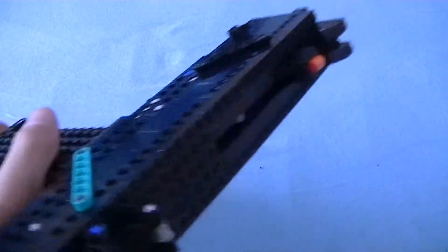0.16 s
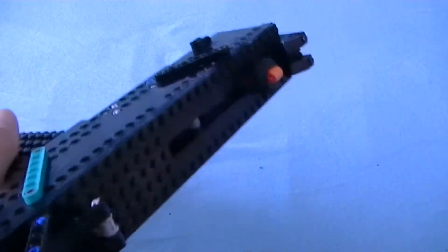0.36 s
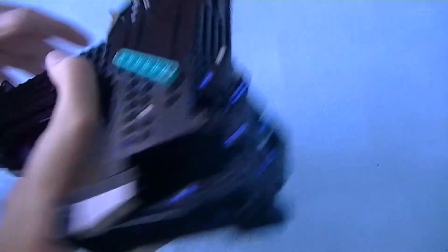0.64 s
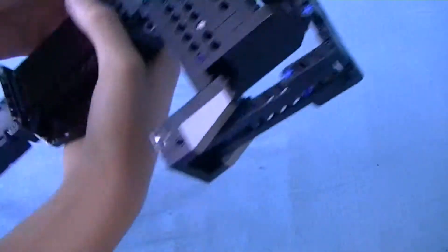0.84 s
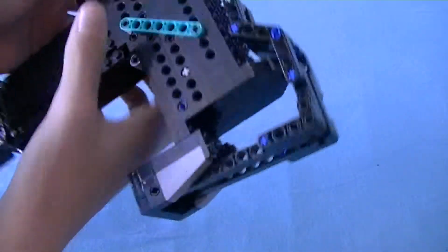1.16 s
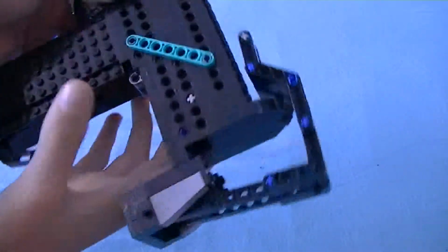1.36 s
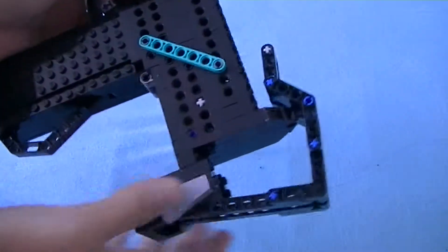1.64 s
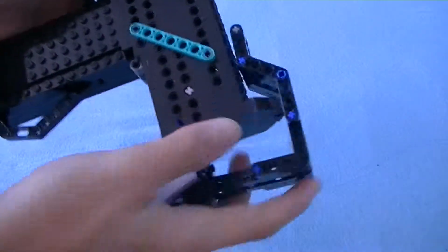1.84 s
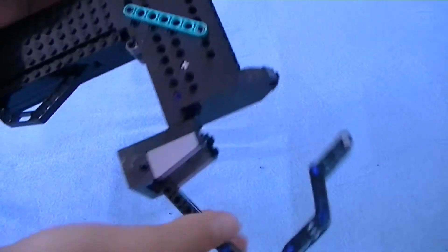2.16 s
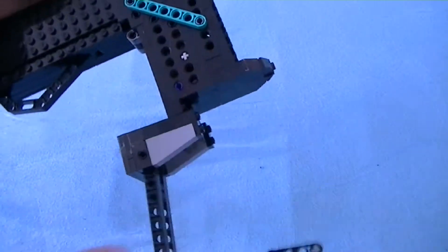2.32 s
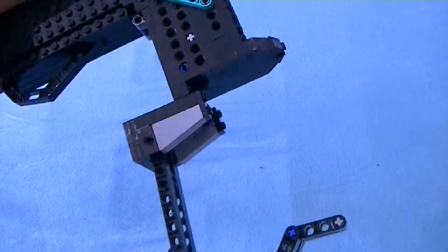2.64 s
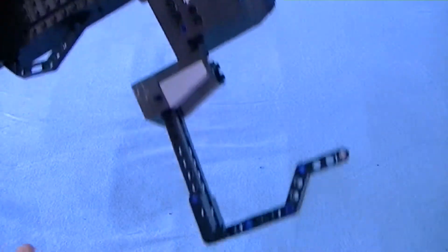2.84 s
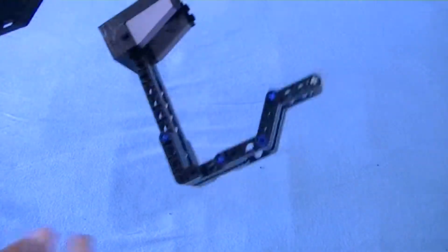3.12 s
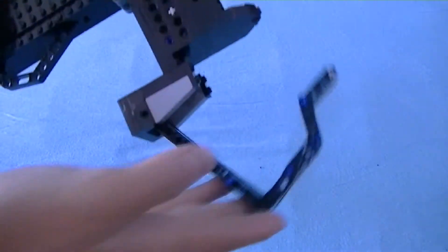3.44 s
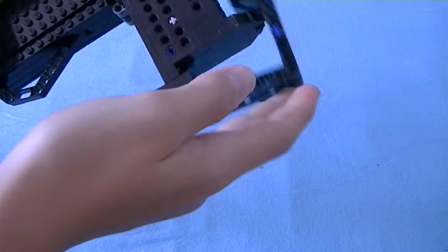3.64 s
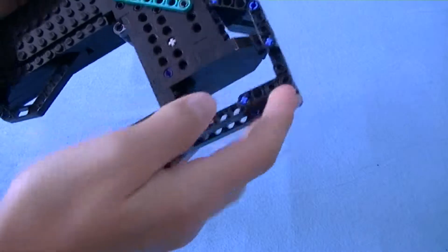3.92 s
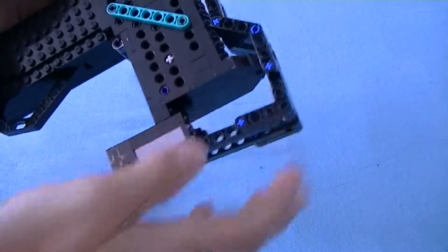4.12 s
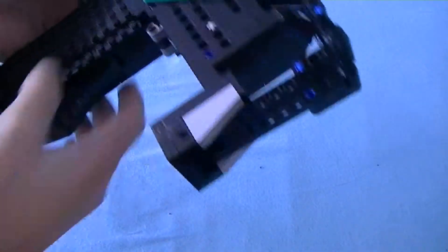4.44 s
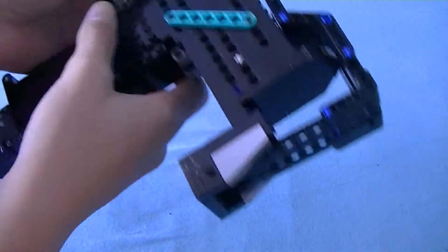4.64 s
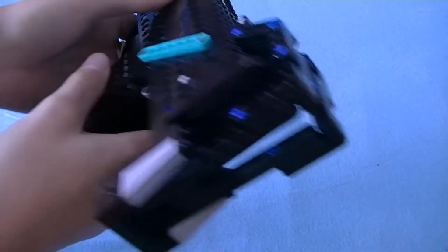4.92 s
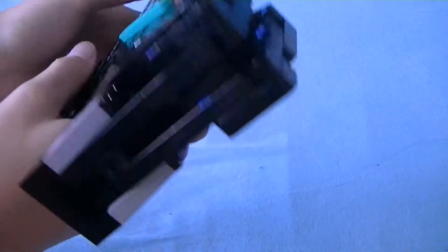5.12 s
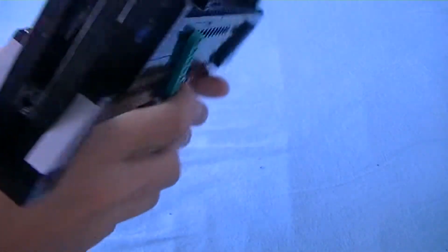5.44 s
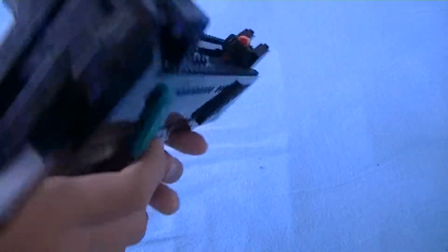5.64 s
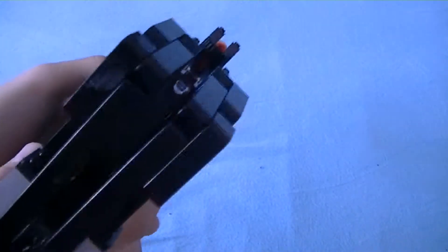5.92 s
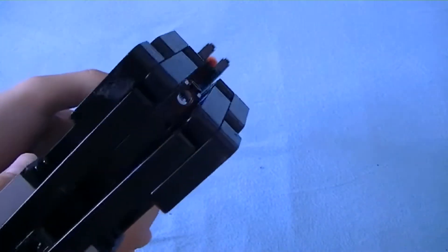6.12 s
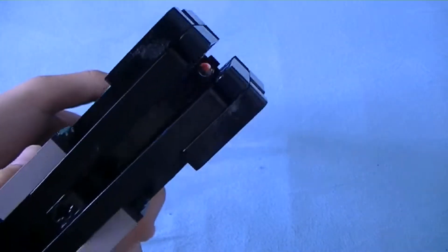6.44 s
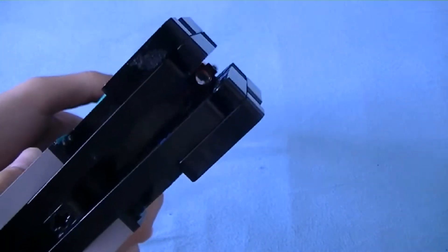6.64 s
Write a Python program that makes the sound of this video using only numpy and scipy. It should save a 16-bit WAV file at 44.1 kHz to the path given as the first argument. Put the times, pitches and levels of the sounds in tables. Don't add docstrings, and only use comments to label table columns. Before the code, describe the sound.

Quiet small room, close small microphone, steady soft hiss with a very faint high pulsing pip, about 25 per second. At 0 s a couple of light plastic ticks and brushing fingers over studs, strongest around 0.2 s. From 0.7 s clicks gather; at 1.03-1.1 s the hollow brick model clatters loudest, bright cracks over a boxy knock. Dense rattling clicks continue to about 1.6 s, strong at 1.35 s, then thin out. A click at 1.9 s, then a hard clack at 2.14 s as the hinged arm opens; small bright ticks at 2.4 s with a rub. Near quiet until 3.43 s; a loud snap with low knock at 3.66 s, rattling to 3.9 s. Isolated ticks at 4.0 and 4.2 s, light duller clicks 4.5-5.6 s, clearer at 4.84 and 5.06 s, one last click at 5.8 s, then faint handling and hiss to 7 s.

```python
import sys
import numpy as np
from scipy import signal
from scipy.fft import rfft, irfft, next_fast_len
from scipy.io import wavfile
from scipy.ndimage import uniform_filter1d

SR = 44100
rng = np.random.default_rng(int(sys.argv[2]) if len(sys.argv) > 2 else 0)


def amp(db):
    return 10 ** (np.asarray(db, float) / 20)


def write(x):
    x = np.atleast_2d(x).T
    wavfile.write(sys.argv[1], SR, np.round(np.clip(x, -1, 1) * 32767).astype(np.int16))


N = 298557


def rms_one(x):
    return x / np.sqrt(np.mean(x ** 2) + 1e-20)


def coloured(x, spectrum):
    size = next_fast_len(N)
    f_hz = np.arange(1, size // 2 + 2) * SR / size
    at_hz, level_db = np.transpose(spectrum)
    outside_oct = np.log2(np.maximum(at_hz[0] / f_hz, 1) * np.maximum(f_hz / at_hz[-1], 1))
    gain_db = np.interp(np.log(f_hz), np.log(at_hz), level_db) - 18 * outside_oct
    return rms_one(irfft(rfft(x, size) * amp(gain_db), size)[:N])


def above(level_db, floor_db):
    return np.sqrt(np.maximum(amp(level_db) ** 2 - amp(floor_db) ** 2, 0))


def hiss():
    # f/Hz, density/dB [per Hz]
    hiss_spectrum = [(12, -58), (20, -4), (31, -21), (156, -8), (230, -5), (342, -3), (452, -3.5),
                     (599, -3.5), (1470, -5), (1690, -6), (3230, -8), (15200, -18), (16500, -44.5)]
    return amp(-58.5) * coloured(rng.standard_normal(N), hiss_spectrum)


def hands():
    # t/s, half length/s, pressure/dB, sliding speed/dB
    strokes = [(0, 0.053, -50, -54.5), (0.178, 0.071, -43, -51), (.33, 0.09, -56, -55),
               (.52, .1, -60.5, -71), (.8, 0.11, -59.5, -57.5), (1.003, 0.057, -53.5, -66.5),
               (1.204, 0.093, -53, -60), (1.45, 0.13, -55, -54.5), (1.902, 0.21, -61, -67),
               (2.2, 0.045, -56, -60), (2.438, 0.1, -54.5, -52), (3.473, .12, -58, -55.5),
               (3.742, 0.095, -58, -62), (4.4, .15, -66.5, -64), (4.701, 0.11, -60.5, -63.5),
               (5.003, 0.084, -61.5, -67), (5.66, 0.1, -62, -55.5), (5.902, 0.11, -67, -62)]
    t_s = np.arange(N) / SR
    power = amp(np.array([[-61], [-61.5]])) ** 2
    for start_s, half_s, press_db, speed_db in strokes:
        bell = np.exp(-((t_s - start_s) / half_s) ** 2)
        power = power + bell * amp(np.array([[press_db], [speed_db]])) ** 2
    return 10 * np.log10(power)


def fingers():
    # f/Hz, density/dB [per Hz]
    rub = [(180, -48.5), (300, -11), (427, -3), (557, -3), (1000, -11), (1300, -34.5), (2200, -120)]
    # f/Hz, density/dB [per Hz]
    scrape = [(470, -27), (800, -6.5), (884, -3), (1360, -4), (1540, -1.5), (2020, 0.5), (4160, -10.5),
              (5000, -12.5), (6500, -43.5), (11000, -120)]
    # f/Hz, density/dB [per Hz]
    skin = [(1760, -40), (3000, 0.5), (4800, 1.5), (7750, 0), (13600, -7.5), (15800, -17.5), (16500, -33)]
    scrape_db, skin_db = hands()
    rub_db = -66.5 + 0.6 * (scrape_db + 60)
    grain_spread_db = np.array([[1.5], [3.0], [2.5]])
    grain_db = grain_spread_db * rng.exponential(1, (3, N)).clip(0, 4.5)
    grains = rng.standard_normal((3, N)) * amp(grain_db)
    slow = uniform_filter1d(uniform_filter1d(rng.standard_normal(N), size=300), size=300)
    lumps = amp(1.5 * rms_one(slow))
    return (above(rub_db, -67.5) * coloured(grains[0], rub)
            + above(scrape_db, -61.5) * coloured(grains[1] * lumps, scrape)
            + above(skin_db, -62.5) * coloured(grains[2], skin))


def pip():
    # t/s, half length/s, peak/dB
    pip_swells = [
        (.7, .08, -57),
        (2.75, 0.084, -63),
        (3.15, .12, -66.5),
        (4.2, 0.11, -65.5),
        (5.62, .15, -57),
        (6.42, 0.11, -58.5),
        (6.65, .03, -64),
        (6.77, .03, -61),
    ]
    pip_hz, pips_per_s, width_ms, start_s, rest_db = 3213, 25, 5.0, 0.002, -75.5
    t_s = np.arange(N) / SR - start_s
    turn = np.round(t_s * pips_per_s)
    shape = np.exp(-0.5 * ((t_s - turn / pips_per_s) * 1000 / width_ms) ** 2)
    uneven_db = 1.5 * rng.standard_normal(int(turn[-1]) + 1)[turn.astype(int)]
    swell = amp(rest_db)
    for at_s, half_s, peak_db in pip_swells:
        swell = swell + amp(peak_db) * np.exp(-0.5 * ((t_s - at_s) / half_s) ** 2)
    return swell * amp(uneven_db) * shape * np.sin(2 * np.pi * pip_hz * t_s)


def contacts():
    # t/s, body peak/dB, crack peak/dB, favoured pitch/Hz
    tipping = [(.012, -29.5, -44, 1684), (.022, -35, -40, 1810), (.088, -43, -58, 900),
               (.622, -49.5, -58, 1585), (.71, -37, -44, 1695), (.84, -30.5, -33, 2450),
               (0.8572, -29.5, -42.5, 1360), (.886, -39.5, -36.5, 1870), (.9045, -40, -47.5, 2406),
               (.9125, -35.5, -44, 1660), (.929, -31.5, -51.5, 1990), (.971, -46, -56.5, 2335),
               (1.022, -30.5, -44, 1690), (1.031, -18.5, -25, 2300), (1.054, -21, -23, 2400),
               (1.057, -17.5, -16, 2500), (1.1042, -11.5, -11, 1410), (1.118, -35.5, -37.5, 1304),
               (1.136, -26, -49, 1500), (1.207, -38.5, -53.5, 1204), (1.22, -35.5, -56, 1300),
               (1.2382, -26.5, -42, 1230), (1.261, -40, -52.5, 1754)]
    regrip = [(1.291, -20.5, -22.5, 2400), (1.305, -40, -38.5, 1530), (1.322, -25, -32, 1900),
              (1.34, -20.5, -17, 2330), (1.344, -23.5, -20, 2400), (1.361, -18.5, -26.5, 1507),
              (1.3786, -19, -38, 2930), (1.422, -20, -37.5, 1300), (1.457, -38, -39, 4500),
              (1.471, -40, -48.5, 2090), (1.499, -39.5, -50, 1155), (1.517, -18, -32.5, 1780),
              (1.546, -38, -38.5, 2100), (1.557, -22, -40, 1210), (1.564, -44, -36, 1220),
              (1.586, -47.5, -43, 1660), (1.717, -48.5, -52.5, 926), (1.747, -34, -52, 1315)]
    arm = [(1.8545, -43.5, -42, 2010), (1.902, -24.5, -27.5, 2720), (1.916, -31, -51, 1500),
           (2.038, -41.5, -53, 2020), (2.046, -30.5, -41.5, 2870), (2.074, -43.5, -45, 1352),
           (2.089, -45, -49.5, 1980), (2.105, -41, -38.5, 2950), (2.129, -30, -43, 2060),
           (2.136, -23, -23, 1990), (2.143, -17, -18.5, 2780), (2.4265, -28, -21, 4200),
           (2.442, -36, -36, 1250), (2.467, -40, -52, 2280), (2.536, -31, -45.5, 1370),
           (3.43, -37, -35, 2430), (3.661, -16, -19, 2204), (3.667, -22.5, -32, 2570),
           (3.7254, -27, -52, 1230), (3.735, -32, -42, 1600), (3.835, -29, -33, 1010),
           (3.862, -40, -54, 2200), (4.001, -39, -35, 2640), (4.182, -36.5, -37, 2740),
           (4.237, -43, -62.5, 1160)]
    turning = [(4.52, -41, -50, 1500), (4.576, -44.5, -55, 1490), (4.614, -32, -51.5, 998),
               (4.649, -43, -61, 1390), (4.684, -42, -46.5, 1950), (4.704, -37, -50, 1404),
               (4.803, -42, -58, 1390), (4.8255, -27, -36.5, 1560), (4.833, -35, -46, 2593),
               (4.841, -21, -43, 1346), (4.958, -48, -49, 1960), (4.977, -35.5, -54.5, 1390),
               (5.014, -46, -56, 2150), (5.059, -24, -41, 1890), (5.167, -27, -38, 1690),
               (5.24, -45, -48.5, 2170), (5.267, -59.5, -49.5, 991), (5.465, -40.5, -42.5, 2400),
               (5.497, -31.5, -45.5, 1000), (5.533, -36, -60.5, 1390), (5.565, -43.5, -52.5, 1603),
               (5.7924, -23.5, -31.5, 1900), (5.822, -49, -40, 1320)]
    touches = [(1.0404, -25, -30.5, 1800), (1.1025, -27, -29, 2500), (2.1495, -22.5, -36, 2500),
               (2.156, -25, -39, 2500), (2.421, -37, -32, 4000), (2.4244, -38, -29, 4200),
               (1.8565, -37, -26, 4600), (3.721, -33.5, -52, 1000), (3.8333, -28, -44, 2800),
               (5.801, -39.5, -49.5, 1600), (1.35, -25.5, -32, 2500), (1.3, -29.5, -42, 2100),
               (1.071, -25, -45.5, 2700), (2.4445, -40, -30, 4500), (1.498, -52, -31, 2500),
               (3.744, -34, -45, 2600), (1.127, -33.5, -46, 1350), (.8885, -41, -46, 4200),
               (1.3415, -24, -22, 3300), (1.347, -26, -29, 3000), (1.355, -30, -34, 2800),
               (1.386, -30, -44, 3000), (1.396, -33, -46, 2800), (5.5, -36, -50, 2300),
               (5.537, -40, -52, 2400), (2.4225, -40, -32, 3000), (2.4318, -36, -44, 4100),
               (2.4345, -37, -44, 4400)]
    rattle = [(.0075, -42, -44, 1800), (.028, -33.5, -50, 1690), (.8642, -38, -46, 2200),
              (.877, -39, -52, 1800), (.927, -37, -44, 2000), (.993, -41.5, -57.5, 2100),
              (1.034, -22, -36, 1800), (1.0445, -31, -37, 1900), (1.049, -33, -36, 2200),
              (1.0774, -30.5, -42, 2300), (1.0862, -32.5, -46, 2300), (1.093, -31, -44, 2000),
              (1.145, -29.5, -50, 1500), (1.155, -33.5, -52, 1400), (1.2266, -34, -52, 1600),
              (1.2827, -38.5, -54, 1500), (1.3087, -40, -36, 1800), (1.4118, -33, -50, 1900),
              (1.4355, -31.5, -46, 1410), (1.5096, -38.5, -44, 1500), (1.5515, -42, -42, 1900),
              (1.5671, -42, -41, 1400), (1.571, -33.5, -46, 1400), (1.577, -46, -45, 1500),
              (1.8495, -43, -45, 2200), (1.907, -26.5, -36, 2700), (1.922, -26, -48, 1500),
              (2.1404, -26, -27, 2200), (2.4286, -32, -27, 4200), (2.4378, -35.5, -42, 1900),
              (3.6644, -21.5, -26, 2700), (3.6711, -19, -32, 2600), (3.6785, -25, -40, 2400),
              (3.6887, -30.5, -39, 2600), (3.7012, -34, -41.5, 2700), (3.7316, -33, -44, 3300),
              (3.8453, -35, -41, 2000), (3.853, -37, -48, 2500), (4.1865, -38.5, -47, 2700),
              (4.815, -42, -60, 1300), (4.8542, -35, -56.5, 1406), (4.8673, -39.5, -58.5, 1294),
              (5.064, -30.5, -50, 1800), (5.073, -36.5, -54, 1500), (5.8197, -41, -42, 1500)]
    # ring stretch/1, crack pitch/Hz where crack level equals body level
    held = [
        (.85, 7500),
        (0.79, 7300),
        (0.93, 8000),
        (0.78, 6100),
        (.9, 9000),
        (.7, 6300),
    ]
    # t/s, pitch/Hz
    cracks = [(0.0224, 6200), (0.8403, 4900), (0.8864, 5600), (1.0311, 6900), (1.0396, 7100),
              (1.0485, 6900), (1.0567, 6000), (1.0651, 4800), (1.0716, 4800), (1.0834, 4500),
              (1.0963, 6200), (1.104, 8100), (1.1143, 5100), (1.1187, 6800), (1.1344, 6800), (1.2375, 5200),
              (1.2915, 6000), (1.3054, 7700), (1.3228, 4400), (1.3395, 6900), (1.3507, 5800),
              (1.3554, 6000), (1.3606, 7900), (1.3778, 4900), (1.4219, 4800), (1.4576, 5600),
              (1.4981, 11600), (1.5168, 6800), (1.5566, 6000), (1.5595, 8600), (1.5629, 9600),
              (1.5671, 9500), (1.5867, 7500), (1.8566, 8800), (1.9026, 6800), (2.0462, 6100),
              (2.1053, 7900), (2.129, 5700), (2.1368, 7600), (2.1404, 8300), (2.1432, 7400), (2.1474, 6600),
              (2.1715, 5800), (2.4267, 8400), (2.4346, 4900), (2.4446, 6300), (2.4512, 5600),
              (3.4308, 8100), (3.661, 7700), (3.6644, 5300), (3.6888, 6200), (3.7013, 6600), (3.8359, 4300),
              (4.0007, 6600), (4.1821, 7700), (4.8257, 6300), (4.8403, 4800), (5.1661, 7300),
              (5.7924, 5600), (5.8226, 8500)]
    same_contact_s, damping_per_db, crack_oct_per_db = 0.0025, 0.0265, 0.022
    crack_s, wall_hz = np.transpose(cracks)
    rows = []
    for table, (stretch, equal_hz) in zip((tipping, regrip, arm, turning, touches, rattle), held):
        for at_s, body_db, crack_db, pitch_hz in table:
            gap_s = np.abs(crack_s - at_s)
            if gap_s.min() < same_contact_s:
                crack_hz = wall_hz[gap_s.argmin()]
            else:
                crack_hz = equal_hz * 2 ** (crack_oct_per_db * (crack_db - body_db))
            damped = stretch - damping_per_db * (body_db + 30)
            rows.append((at_s, body_db, crack_db, pitch_hz, damped, crack_hz))
    return rows


def struck(modes, chance, stretch, favoured_hz, spread_db, detune, focus_db):
    f_hz, level_db, t60_s = np.transpose(modes)[:, :, None]
    t60_s = t60_s * max(stretch, 0.2)
    t_s = np.arange(round(min(0.13, 0.8 * t60_s.max()) * SR)) / SR
    off_pitch_oct = np.abs(np.log2(f_hz / favoured_hz))
    level_db = level_db + spread_db * chance[0][:, None] - focus_db * off_pitch_oct
    sign = np.sign(chance[2][:, None] + 0.9)
    wave = sign * np.sin(2 * np.pi * f_hz * (1 + detune * chance[1][:, None]) * t_s)
    ring = np.sum(amp(level_db) * np.exp(-np.log(1000) * t_s / t60_s) * wave, axis=0)
    return np.pad(ring, (0, 6144 - len(t_s)))


def shiver(noise, low_hz, high_hz, level_db, t60_s):
    t_s = np.arange(len(noise)) / SR
    f_hz = np.arange(1, len(noise) // 2 + 2) * SR / len(noise)
    loss = np.sqrt((1 + (low_hz / f_hz) ** 6) * (1 + (f_hz / high_hz) ** 4))
    band = irfft(rfft(noise) / loss, len(noise))
    swell = 1 - np.exp(-t_s / 0.0035)
    return amp(level_db - 60 * t_s / t60_s) * swell * rms_one(band)


def clicks():
    # f/Hz, level/dB, t60/s
    body_modes = [(560, -16, 0.043), (762, -6, 0.037), (920, -4.5, 0.041), (1055, 2.5, 0.032),
                  (1123.4, 0.5, 0.047), (1220, 0.5, 0.029), (1315, 2.5, 0.043), (1390, 3, 0.022),
                  (1496, 4, 0.024), (1665, -2.5, 0.047), (1780, 0, 0.019), (1935, 2.5, 0.022),
                  (1990, -8.5, 0.052), (2090, 5.5, 0.015), (2160, 0.5, 0.021), (2400, 4, 0.019),
                  (2523, 5.5, 0.019), (2640, -3, 0.041), (2870, 6.5, 0.019), (3167, 0.5, 0.031),
                  (3424, -4.5, 0.03), (3700, -3, .015), (4150, -3, .012), (4600, -6, .012)]
    # f/Hz, level/dB, t60/s
    wall_modes = [(3970, -7, 0.0047), (4720, -12, 0.0097), (5670, -15.5, 0.014), (6100, 0.5, 0.0013),
                  (6720, -0.5, 0.0027), (7340, -4.5, 0.0025), (8720, -2.5, 0.0032), (9330, -4, .003),
                  (11100, -4.5, 0.003), (12050, -7.5, 0.0027), (15500, -16.5, 0.0013)]
    # level/dB [re blow], t60/s
    buzz_decay = [
        (-17, 0.12),
        (-19, 0.07),
    ]
    (body_buzz_db, body_t60_s), (wall_buzz_db, wall_t60_s) = buzz_decay
    contact_ms, swell_s, resonant_share = 0.54, 0.0006, 0.35
    lead = 40
    out, t_ms, blows = np.zeros(N + SR), np.arange(400) / SR * 1000, contacts()
    chances = rng.standard_normal((len(blows), 3, len(body_modes) + len(wall_modes)))
    chatters = rng.standard_normal((len(blows), len(t_ms))) ** 3
    chatters = chatters * (t_ms + 0.22) * np.exp(-t_ms / contact_ms)
    chatters[:, 36] += 5.0
    noises = rng.standard_normal((len(blows), 2, 6144))
    for blow, chance, chatter, noise in zip(blows, chances, chatters, noises):
        at_s, body_db, crack_db, pitch_hz, stretch, crack_hz = blow
        body_chance, wall_chance = np.split(chance, [len(body_modes)], axis=1)
        body = struck(body_modes, body_chance, stretch, pitch_hz, spread_db=2.5, detune=0.008, focus_db=9.5)
        body = body * (1 - np.exp(-np.arange(len(body)) / SR / swell_s)) ** 2
        walls = struck(wall_modes, wall_chance, 1.0, crack_hz, spread_db=1.0, detune=0.03, focus_db=5.0)
        resonant = rms_one(irfft(rfft(noise[0] ** 3) * rfft(body)))
        rung = resonant_share * resonant + (1 - resonant_share) * noise[1]
        longer = max(stretch, 0.2)
        body_buzz = shiver(rung, 0.65 * pitch_hz, 1.64 * pitch_hz, body_buzz_db, body_t60_s * longer)
        wall_buzz = shiver(noise[1], 3300, 1.2 * crack_hz, wall_buzz_db, wall_t60_s * longer)
        walls = np.pad(np.convolve(walls[:600], chatter), (0, len(body)))[:len(body)]
        start = round(at_s * SR) - lead
        for ring, buzz, peak_db in ((body, body_buzz, body_db - 0.1), (walls, wall_buzz, crack_db + 7.0)):
            out[start:start + len(ring)] += amp(peak_db) * (ring / np.abs(ring).max() + buzz)
    small = signal.sosfilt(signal.butter(4, 734, "high", fs=SR, output="sos"), out[:N])
    return small + amp(-33.5) * out[:N]


def thumps():
    # t/s, peak/dB
    heavy_blows = [
        (1.029, -42),
        (1.103, -45.5),
        (2.143, -40.5),
        (3.661, -42),
        (3.673, -41.5),
        (3.722, -43),
    ]
    # f/Hz, level/dB, t60/s
    whole_modes = [(270, -5.5, 0.043), (390, -3, .04), (483, 0.5, 0.049), (602, 1, 0.046)]
    out = np.zeros(N)
    chances = rng.standard_normal((len(heavy_blows), 3, len(whole_modes)))
    for (at_s, peak_db), chance in zip(heavy_blows, chances):
        knock = struck(whole_modes, chance, 1, 450, spread_db=3.5, detune=0.05, focus_db=-1.5)
        out[round(at_s * SR):][:len(knock)] += amp(peak_db) * knock / np.abs(knock).max()
    return signal.sosfilt(signal.butter(2, 230, "high", fs=SR, output="sos"), out)


def room(x):
    # f/Hz, t60/s
    room_decay = [(700, 0.17), (1600, 0.25), (4200, .16), (10000, 0.14)]
    t_s, tail = np.arange(SR // 3) / SR, 0
    for f_hz, t60_s in room_decay:
        band = signal.butter(1, [f_hz * 0.6, f_hz * 1.6], "band", fs=SR, output="sos")
        tail = tail + signal.sosfilt(band, rng.standard_normal(len(t_s))) * amp(-60 * t_s / t60_s)
    tail = tail * np.clip(t_s / 0.0029 - 0.5, 0, 1)
    return signal.fftconvolve(x, tail / np.sqrt(np.sum(tail ** 2)))[:N]


def scene():
    near = clicks() + thumps()
    return (near + amp(-14.5) * room(near) + fingers() + pip() + hiss())[None]


def roll_off(x):
    return signal.sosfilt(signal.butter(12, 17160, fs=SR, output="sos"), x)


def record(dry):
    mic = signal.sosfilt(signal.butter(10, 15800, fs=SR, output="sos"), dry)
    return roll_off(mic)


dry = scene()
out = record(dry)
write(out)
```